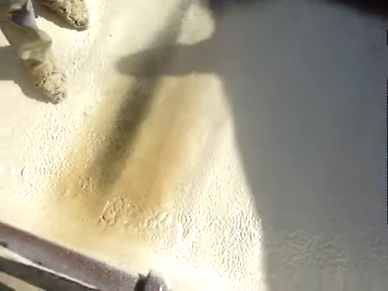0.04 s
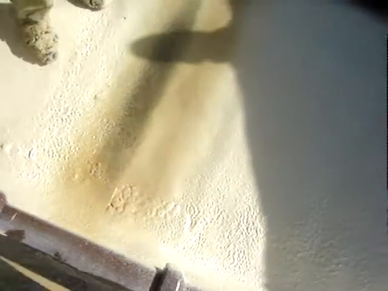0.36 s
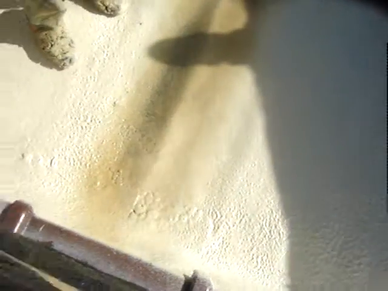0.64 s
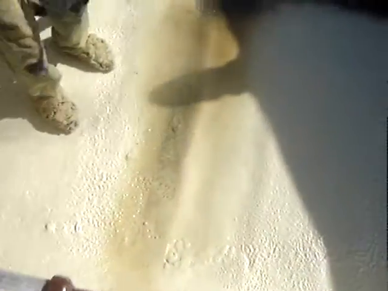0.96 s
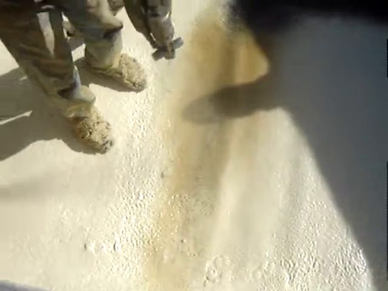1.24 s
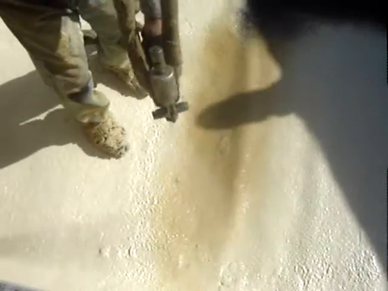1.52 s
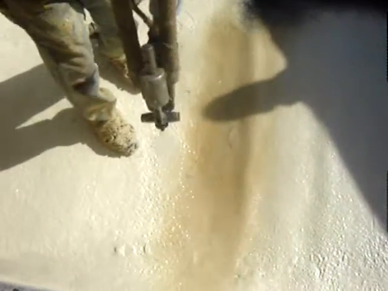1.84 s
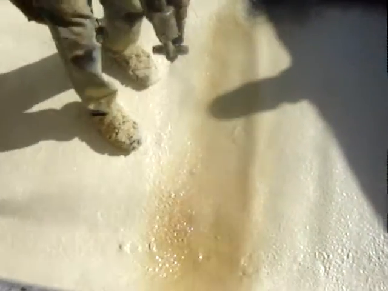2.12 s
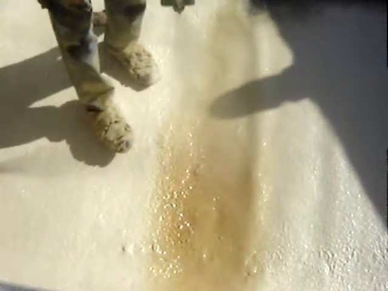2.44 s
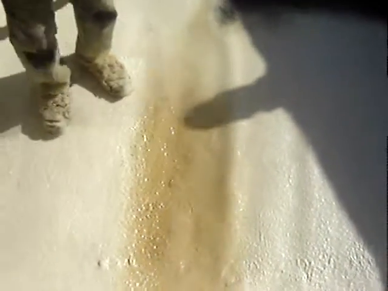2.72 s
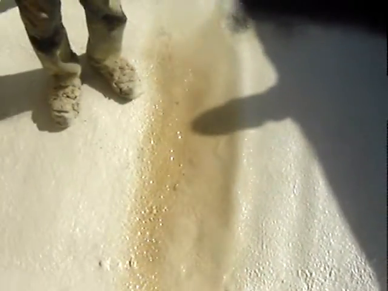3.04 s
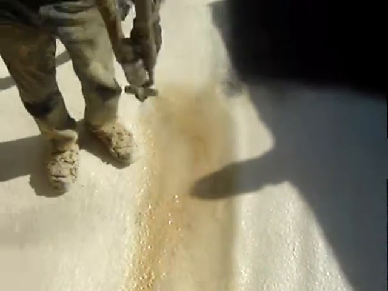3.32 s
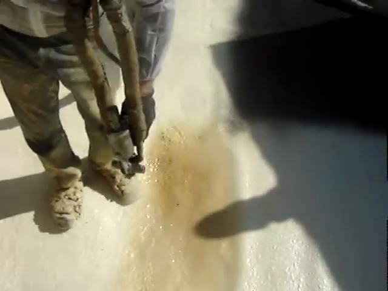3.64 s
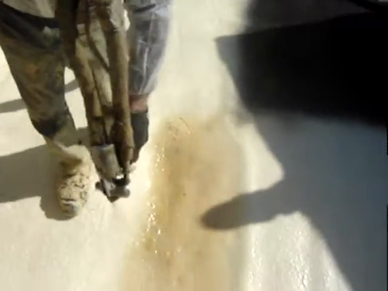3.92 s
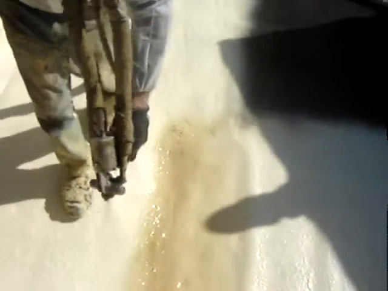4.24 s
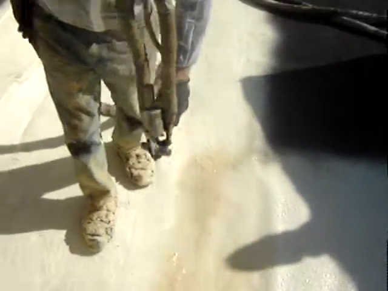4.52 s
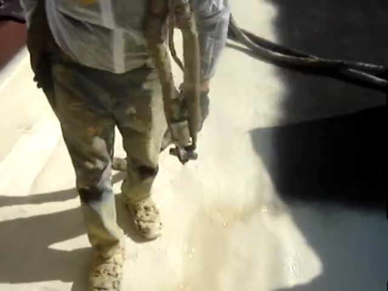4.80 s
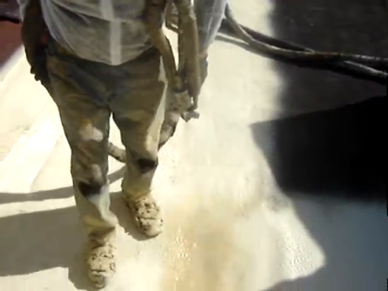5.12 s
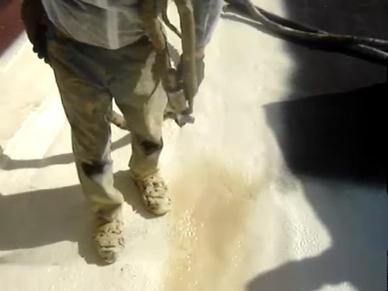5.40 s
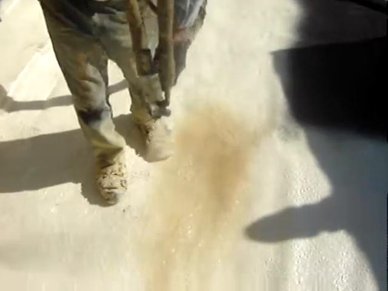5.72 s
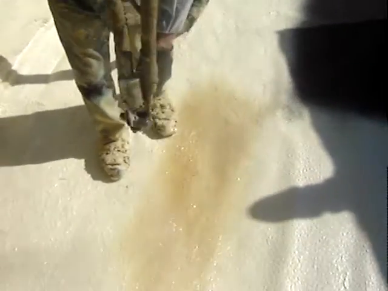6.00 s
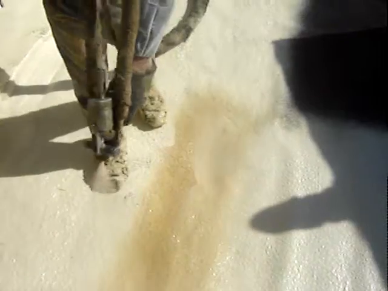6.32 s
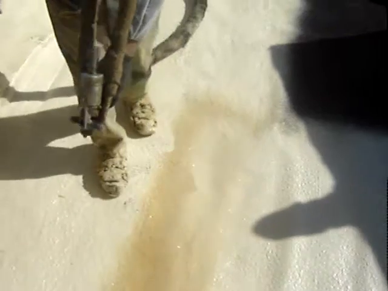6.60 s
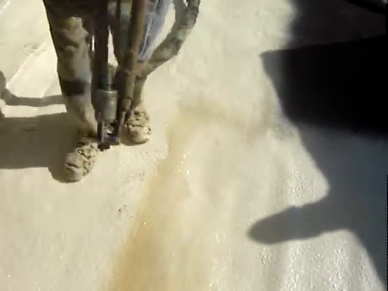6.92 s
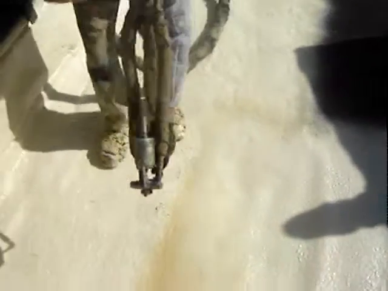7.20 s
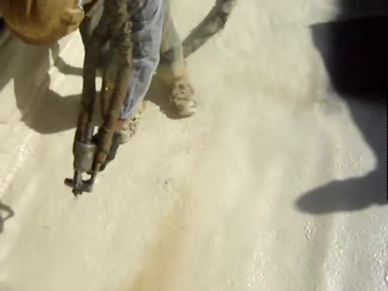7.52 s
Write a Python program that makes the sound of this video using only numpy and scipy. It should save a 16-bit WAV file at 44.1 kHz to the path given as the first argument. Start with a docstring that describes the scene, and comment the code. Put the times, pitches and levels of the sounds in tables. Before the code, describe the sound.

A spray gun hisses loudly and steadily with foam, shuts off with a metallic judder, then clacks and sprays again.

```python
"""First comes the hiss and sputter of a spray gun laying foam on a flat roof, with an engine humming far off.
The fan of droplets changes its tone as it is swept to and fro, and the roof returns a faint moving echo.
The valve shuts with a ringing judder, air leaks softly while boots scuff, then the valve clacks open.
A mono camera nearby hears it all, and its automatic gain lifts the background during the pause."""
import sys
import numpy as np
from scipy import signal
from scipy.fft import rfft, irfft, next_fast_len
from scipy.io import wavfile
from scipy.ndimage import uniform_filter1d, map_coordinates

SR = 44100
rng = np.random.default_rng(int(sys.argv[2]) if len(sys.argv) > 2 else 0)


def unload_wav(signal):
    """Save mono or channel-first audio to the path in sys.argv[1] as 16-bit WAV at rate SR, clipped to [-1, 1]."""
    wavfile.write(
        sys.argv[1],
        SR,
        np.round(np.clip(np.atleast_2d(signal).T, -1, 1) * 32767).astype(np.int16),
    )


N = 332955

# the spray's low roar, middle rush and high sizzle: (frequency [Hz], level [dB])
ROAR_SPECTRUM = [(150, -21), (400, -11.5), (700, -1), (1100, -1), (1500, -2), (2000, -12.5), (3500, -45.5)]
RUSH_SPECTRUM = [(900, -40), (1400, -6), (1800, -2), (2400, -1.5), (3400, -3), (4500, -1), (5300, -1),
                 (7500, -29.5)]
SIZZLE_SPECTRUM = [(3000, -31), (4400, -12), (5200, -1.5), (6000, 1.5), (7000, 0), (8500, 0), (10000, -0.5)]
# how loud the fan is as the gun is swept: (time [s], roar level [dB], rush level [dB])
FAN_LEVELS = [(0.0, -28, -22.5), (0.05, -37, -27.5), (0.13, -35, -28), (0.14, -39.5, -30), (0.51, -37, -31),
              (1.23, -37.5, -29.5), (1.38, -31, -25), (1.47, -37, -27), (2.47, -35, -27.5),
              (2.81, -41.5, -30.5), (4.19, -37, -31.5), (4.28, -43.5, -34.5), (4.57, -31.5, -27.5),
              (4.98, -34.5, -24.5), (5.41, -37, -27), (5.7, -33, -28), (6.26, -29.5, -26),
              (6.52, -35, -26.5)]
# how loud the sizzle is: (time [s], level [dB])
SIZZLE_LEVELS = [(0.0, -22.5), (0.58, -31), (0.62, -28), (1.18, -20.5), (1.23, -26), (1.4, -19), (1.5, -28),
                 (1.63, -21), (2.03, -22), (2.31, -24.5), (2.98, -22.5), (3.51, -26), (3.67, -19.5),
                 (3.78, -25), (4.25, -28), (4.67, -21.5), (4.87, -27), (6.52, -23.5)]
# brief swells and dips in the loudness of the hiss:
# (time [s], rush change [dB], sizzle change [dB], half length [s])
HISS_SWELLS = [(2.767, -3, -9, 0.0069), (3.67, 4, 1, 0.044), (3.763, 0, -4, .0034), (4.95, 0.5, 1, 0.072),
               (5.457, 3.5, 2, 0.079), (5.91, 1, 2.2, 0.074)]
# the hump, where the fan's middle range is loudest: (time [s], centre [Hz])
HUMP_PATH = [(0.0, 2230), (0.05, 3040), (1.42, 2580), (1.91, 3010), (2.54, 2380), (3.1, 3220), (3.36, 2490),
             (4.39, 3110), (4.47, 2540), (4.74, 2270), (5.38, 2990), (5.7, 2050), (6.34, 2500),
             (6.52, 3200)]
# a bright peak that glides as the gun turns: (time [s], centre [Hz], height [dB])
PEAK_PATH = [(.1, 8800, 4.5), (.8, 5900, 2.5), (1.05, 9850, 1.5), (1.6, 7500, 2), (2.1, 7240, 2.5),
             (2.4, 7100, 1), (3.05, 8660, 3), (3.5, 6430, 0), (4.3, 5070, 0.5), (6.3, 5750, 2),
             (7.5, 8200, 1)]
# a second, longer path from the nozzle ripples the spectrum: (time [s], delay [ms], ripple [dB])
SECOND_PATH = [(0, 0.3, 1), (1, 0.36, 1.5), (1.3, 0.36, 0), (2, 0.35, -0.2), (2.8, 0.46, 1),
               (3.3, 0.41, 0.8), (4, 0.33, -1), (5.35, 0.55, 0.5), (5.85, 0.8, 1), (6.5, 0.6, -0.5)]
# the roof's echo follows the sweep: (time [s], delay [ms])
ROOF_DELAYS = [(0, 3.6), (.6, 3.7), (1.2, 4.4), (1.9, 4.2), (2.6, 3.2), (3.2, 4.6), (4.3, 3.8), (5.3, 3.1),
               (5.9, 3.4), (6.5, 2.9)]

# short sounds: (time [s], level [dB], rise [s], decay [s])
PISTON_PUFFS = [(6.541, -22, 0.0039, 0.014), (6.574, -24, 0.018, 0.018), (7.425, -34, .02, .06)]  # air let out by the gun's piston
PISTON_CLACK = [(7.4095, -5.5, 0.0039, 0.0027)]  # the piston hits its stop
NOZZLE_WHISTLES = [(7.414, -22, .005, 0.024), (7.44, -26, 0.032, 0.03)]  # the flow starts
FITTING_TAPS = [(.124, -19.5, 0.0012, 0.0033), (6.542, -17, 0.0027, 0.0065), (6.564, -24, 0.00091, 0.0023),
                (7.154, -34, .001, 0.0033)]  # trigger and fittings touch
BOOT_SCUFFS = [(6.861, -36.5, 0.011, .02), (7.054, -33.5, 0.029, 0.046), (7.11, -37, 0.006, 0.012)]  # soles scrape the foam
FOOTSTEPS = [(.6, -38, 0.014, 0.029), (1.605, -35, .008, 0.018), (1.72, -37, 0.017, 0.046)]  # feet land on the roof deck
# the pitches at which things ring: (frequency [Hz], width [Hz], level [dB])
EXHAUST_RING = [(930, 60, -1), (1164, 55, 0), (1810, 73, -2), (2240, 110, -2), (750, 37, -12),
                (4800, 300, -17)]
FITTING_RING = [(730, 92, 7), (1400, 600, 0.5), (2300, 700, 3), (3380, 200, -7)]
DECK_RING = [(90, 30, -2), (142, 29, 3), (210, 71, -13)]
# the piston strikes the gun's body as it shuts: (time [s], level [dB])
JUDDER_HITS = [(6.547, -21), (6.565, -25), (6.589, -26), (6.609, -42)]
# the ringing of that body: (frequency [Hz], level [dB], time to fade by 60 dB [s])
BODY_TONES = [(716, -8.5, 0.17), (942, -4, 0.14), (1120, -4, 0.1), (1176, -5, 0.12), (1860, -2.5, 0.12),
              (2290, -10, .17), (2680, -13, .05), (3210, -12, 0.11), (4640, -5, .1), (4885, -8, 0.11)]
# tones of the nozzle, and of the engine and compressor: (frequency [Hz], level [dB])
NOZZLE_TONES = [(930, -5), (2560, 3), (3875, -0.5), (4020, -4), (5250, -6)]
ENGINE_TONES = [(61.3, -6.5), (122.7, -5.5), (132, -17), (172, -12.5), (212.4, -11.5), (243.6, -9.5),
                (350.8, -22), (393.8, -21), (477.5, -25), (528, -18), (669, -15), (705.7, -23),
                (2118, -13.5)]
# noise of the clack, soles, leaking air and outdoor rumble: (frequency [Hz], level [dB])
CLACK_SPECTRUM = [(30, -10), (70, -1), (260, 6), (450, -2), (700, 5.5), (1450, -5), (2400, 1), (3200, -12),
                  (3850, 0), (4500, -13), (7000, 1.5), (10000, -4.5)]
SOLE_SPECTRUM = [(300, -25), (700, -2), (1500, -1.5), (3500, 2), (6000, -3), (8500, -3), (10000, -14)]
LEAK_SPECTRUM = [(240, -39), (400, -14.5), (538, -11), (607, -10), (686, -8.5), (743, -13.5), (973, -15.5),
                 (1930, -18.5), (2070, -17), (3790, -16), (5910, -11), (10000, -15.5), (13000, -57.5),
                 (22000, -120)]
RUMBLE_SPECTRUM = [(15, -36), (30, -18), (50, -4), (75, -2.5), (135, -3), (200, -4), (330, -4.5),
                   (500, -6.5), (900, -13), (2000, -38.5)]
# how loud the far engine and the rumble are: (time [s], level [dB])
ENGINE_LEVELS = [(0.0, -42.5), (0.62, -43), (1.12, -45.5), (2.33, -44.5), (3.92, -50.5), (5.02, -44),
                 (6.4, -45), (6.6, -47)]

SHUT_S, CLOSING_S, OPEN_S, OPENING_S = 6.598, 0.046, 7.411, 0.0065  # start and length of each valve move
RESTART_ROAR_DB, RESTART_RUSH_DB, RESTART_SIZZLE_DB = -37, -27, -21.5  # once the valve reopens
HUMP_OCTAVES, PEAK_OCTAVES = 0.67, 0.17  # widths
HOLLOW_RATIO, HOLLOW_DB, HOLLOW_OCTAVES = 1.51, -0.35, 0.14  # a slight dip riding above the hump
LEAK_DB, LEAK_DROP_DB = -40, 6  # the leak drops while foam flows
STEADY_DB, SQUEEZE = -20.5, 0.29  # the camera pulls levels this share of the way to STEADY_DB
SENSE_S, FORGET_DB_PER_S = 0.0072, 32  # how long it listens, how fast it forgets a peak
TOP_HZ = 10120  # the highest sound it takes in


def spray():
    """The fan of foam: a low roar, a rush and a sputtering sizzle, all fed through the valve."""
    t = clock()
    swept_db = curves(FAN_LEVELS, t) + curves(SIZZLE_LEVELS, t)  # three curves in one list
    restart_db = [[RESTART_ROAR_DB], [RESTART_RUSH_DB], [RESTART_SIZZLE_DB]]
    roar_db, rush_db, sizzle_db = np.where(t < OPEN_S, swept_db, restart_db)
    rush_swell_db, sizzle_swell_db = sum(np.outer([low, high], np.exp(-((t - s) / half) ** 2))
                                         for s, low, high, half in HISS_SWELLS)
    roar = jet(ROAR_SPECTRUM, hump_db=6.5, flicker_db=1.5, drift_db=-0.4)
    roar *= amp(roar_db + 0.02 + 1.1 * wobble(18))
    rush = jet(RUSH_SPECTRUM, hump_db=6.5, flicker_db=0.62, drift_db=1.4)
    rush *= amp(rush_db + rush_swell_db + 0.24 + 0.79 * wobble(18))
    mist = jet(SIZZLE_SPECTRUM, hump_db=-4, flicker_db=1.5, drift_db=0)
    # the sheet of liquid breaks up unevenly, so the sizzle flutters at several speeds
    flutter = amp(0.36 * wobble(22) + 1.21 * wobble(120) + 1.23 * wobble(600))
    sputter = (mist + 0.32 * droplets(per_second=560, spread_db=3)) * flutter
    sizzle = amp(sizzle_db + sizzle_swell_db + 0.4) * unit(cut_highs(sputter))
    waver = amp(0.2 * wobble(12) + 0.32 * wobble(40))
    return (roar + rush + sizzle) * valve() * waver


def jet(spectrum, hump_db, flicker_db, drift_db):
    """Jet noise of steady power whose tone follows the turning fan, flickers and slowly drifts."""
    hz, t, slices = signal.stft(rng.standard_normal(N), SR, nperseg=512)
    hz = hz[:, None]
    bell = lambda centre, octaves: np.exp(-(np.log2((hz + 1) / centre) / octaves) ** 2 / 2)
    hump_hz, = curves(HUMP_PATH, t)
    peak_hz, peak_db = curves(PEAK_PATH, t)
    delay_ms, ripple_db = curves(SECOND_PATH, t)
    tone_db = hump_db * bell(hump_hz, HUMP_OCTAVES)
    tone_db += HOLLOW_DB * bell(HOLLOW_RATIO * hump_hz, HOLLOW_OCTAVES)
    tone_db += peak_db * bell(peak_hz, PEAK_OCTAVES)
    tone_db += ripple_db * np.cos(2 * np.pi * hz * delay_ms / 1000)
    tone_db += flicker_db * patches(slices.shape, bands=10, frames=12)
    tone_db += drift_db * patches(slices.shape, bands=18, frames=60)
    gain = spectrum_gain(spectrum, hz) * amp(tone_db)
    gain /= np.linalg.norm(gain, axis=0)  # the same power at every moment
    return unit(signal.istft(slices * gain, SR, nperseg=512)[1][:N])


def droplets(per_second, spread_db):
    """The liquid tears into drops of many sizes, each making a tiny tick."""
    chance, size, sign = rng.random(N), rng.standard_normal(N), rng.choice([-1, 1], N)
    ticks = (chance < per_second / SR) * sign * amp(spread_db * np.minimum(size, 2))
    return unit(filtered(ticks, lambda hz: spectrum_gain(SIZZLE_SPECTRUM, hz)))


def valve():
    """The valve slides shut (0) and later snaps open (1)."""
    t = clock()
    return np.clip(1 - (t - SHUT_S) / CLOSING_S, 0, 1) + np.clip((t - OPEN_S) / OPENING_S, 0, 1)


def with_roof_echo(hiss, echo_db):
    """The roof returns the hiss a few milliseconds late; the changing delay makes a faint swirl."""
    delay_samples = curves(ROOF_DELAYS, clock())[0] * SR / 1000
    return hiss + amp(echo_db) * map_coordinates(hiss, [np.arange(N) - delay_samples])


def piston():
    """The air piston puffs through its exhaust, judders shut, and clacks on its stop as it reopens."""
    puffs = bursts(PISTON_PUFFS) * ringing_noise(EXHAUST_RING)
    clack = bursts(PISTON_CLACK) * noise(CLACK_SPECTRUM)
    return puffs + judder() + clack


def judder():
    """Each blow of the piston rings the gun's body with a slightly different mix of tones."""
    sound, t = np.zeros(N), np.arange(SR // 4) / SR
    onset = 1 - np.exp(-t / 0.0011)
    for s, hit_db in JUDDER_HITS:
        ring = sum(amp(db + rng.normal(0, 1.3) - 60 * t / fade_s)
                   * np.sin(2 * np.pi * (hz * t + rng.random())) for hz, db, fade_s in BODY_TONES)
        sound[round(s * SR):][:len(t)] += amp(hit_db) * ring * onset
    return sound


def whistle():
    """The nozzle's edge whistles unsteadily while the flow builds up."""
    t = clock()
    tones = sum(amp(db) * np.sin(2 * np.pi * hz * t + wobble(130)) for hz, db in NOZZLE_TONES)
    return bursts(NOZZLE_WHISTLES) * unit(tones)


def taps():
    """The trigger and hose fittings knock lightly and ring for a moment."""
    return bursts(FITTING_TAPS) * ringing_noise(FITTING_RING)


def boots():
    """Soles scrape the gritty foam skin and thud on the deck."""
    grit = unit(cut_highs(noise(SOLE_SPECTRUM) * amp(1.9 * wobble(400))))
    return bursts(BOOT_SCUFFS) * grit + bursts(FOOTSTEPS) * ringing_noise(DECK_RING)


def leak():
    """Air keeps streaming softly from the nozzle, most when the valve is shut."""
    return amp(LEAK_DB - LEAK_DROP_DB * valve() + 0.83 * wobble(25)) * noise(LEAK_SPECTRUM)


def engine():
    """A far engine and compressor hum with wavering tones over the outdoor rumble."""
    t = clock()
    hum = sum(amp(db + 1.9 * wobble(2.99))
              * np.sin(2 * np.pi * (hz * t + rng.random()) + 0.38 * wobble(5.5))
              for hz, db in ENGINE_TONES)
    rumble = amp(0.2 + 1.2 * wobble(10)) * noise(RUMBLE_SPECTRUM)
    return amp(curves(ENGINE_LEVELS, t)[0]) * (amp(0.7) * hum + rumble)


def amp(db):
    """Turn decibels into a number to multiply by."""
    return 10 ** (np.asarray(db) / 20)


def unit(x):
    """Scale x to an average power of 1."""
    return x / np.sqrt(np.mean(x ** 2) + 1e-20)


def clock():
    """The time of every sample, in seconds."""
    return np.arange(N) / SR


def curves(rows, t):
    """Join a table's rows with straight lines: one curve for each column after the time."""
    times, *columns = np.transpose(rows)
    return [np.interp(t, times, column) for column in columns]


def bursts(rows):
    """The loudness of short sounds that rise evenly and then die away."""
    t = clock()
    return sum(amp(db) * np.clip((t - s) / rise, 0, 1) * np.exp(-np.maximum(t - s - rise, 0) / decay)
               for s, db, rise, decay in rows)


def wobble(rate):
    """A smooth curve through `rate` random points a second."""
    return map_coordinates(rng.standard_normal(int(N * rate / SR) + 4), [clock() * rate])


def patches(shape, bands, frames):
    """Smooth random blotches, about `bands` wide in frequency and `frames` long in time."""
    across_bands = uniform_filter1d(rng.standard_normal(shape), bands, axis=0)
    return unit(uniform_filter1d(across_bands, frames, axis=1))


def spectrum_gain(spectrum, hz):
    """A spectrum's gain at hz; one that ends at -30 dB or lower is silent past its end."""
    points_hz, db = np.transpose(spectrum)
    beyond_db = db[-1] if db[-1] > -30 else -120
    return amp(np.interp(np.log(hz + 1), np.log(points_hz), db, right=beyond_db))


def filtered(x, response):
    """Turn each frequency in x up or down by response(hz)."""
    size = next_fast_len(N + SR // 2)
    return irfft(rfft(x, size) * response(np.fft.rfftfreq(size, 1 / SR)), size)[..., :N]


def noise(spectrum):
    """Steady noise with the given spectrum."""
    return unit(filtered(rng.standard_normal(N), lambda hz: spectrum_gain(spectrum, hz)))


def ringing_noise(pitches):
    """Noise that sets a hollow space or a solid part ringing at its own pitches."""
    def response(hz):
        return sum((-1) ** k * amp(db) * 1j * hz * width / (centre ** 2 - hz ** 2 + 1j * hz * width)
                   for k, (centre, width, db) in enumerate(pitches))
    return unit(filtered(rng.standard_normal(N), response))


def cut_highs(x):
    """Remove everything above the camera's top frequency."""
    return filtered(x, lambda hz: 1 / np.sqrt(1 + np.minimum(hz / TOP_HZ, 2) ** 300))


def scene():
    """Everything reaches one microphone."""
    gun = with_roof_echo(spray(), echo_db=-28) + piston() + whistle() + taps()
    mono = gun + boots() + leak() + engine()
    return np.array([mono, mono])


def record(dry):
    """The camera turns loud sound down at once, creeps back up in the pause, and cuts the highs."""
    power = np.abs(uniform_filter1d(dry[0] ** 2, int(SENSE_S * SR)))
    level_db = 10 * np.log10(power + 1e-12)
    forgotten_db = FORGET_DB_PER_S * clock()
    held_peak_db = np.maximum.accumulate(level_db + forgotten_db) - forgotten_db
    return cut_highs(dry * amp(SQUEEZE * (STEADY_DB - held_peak_db)))


dry = scene()
out = record(dry)
unload_wav(out)
```